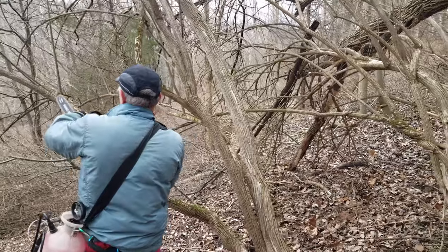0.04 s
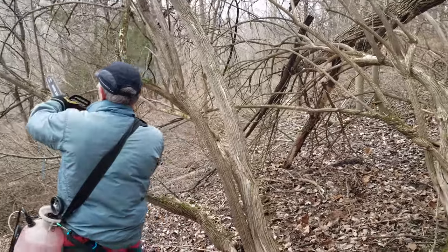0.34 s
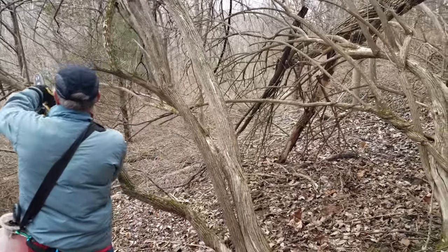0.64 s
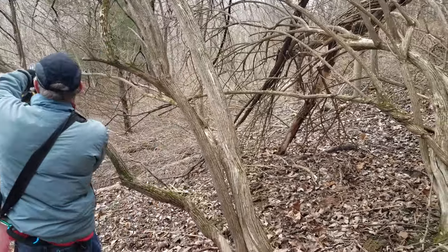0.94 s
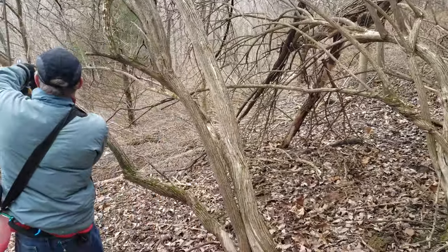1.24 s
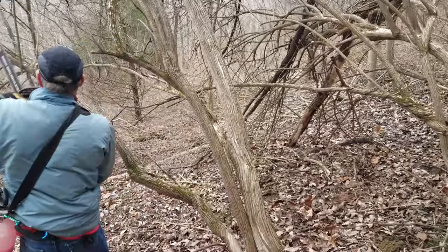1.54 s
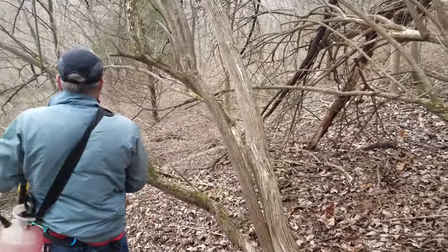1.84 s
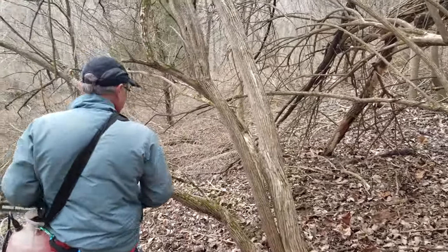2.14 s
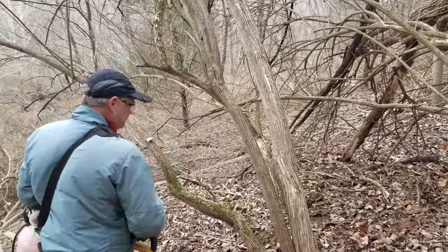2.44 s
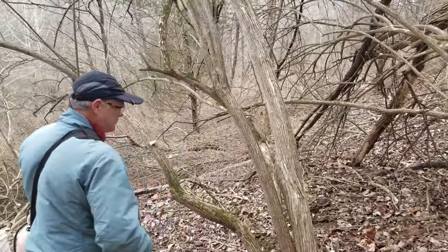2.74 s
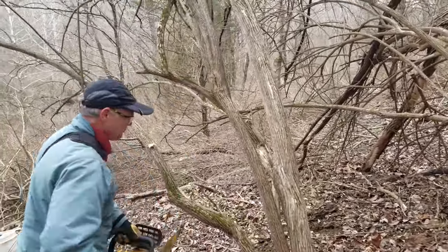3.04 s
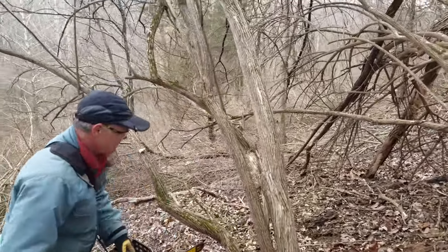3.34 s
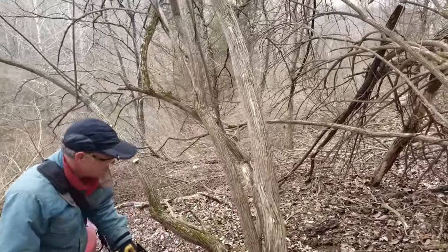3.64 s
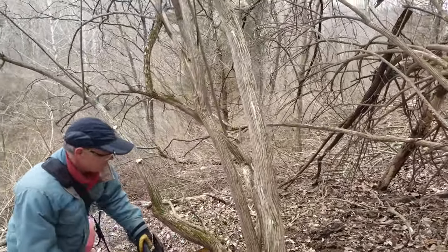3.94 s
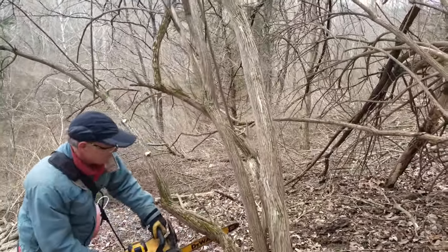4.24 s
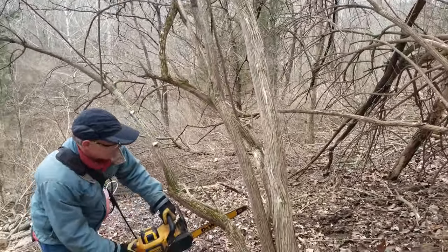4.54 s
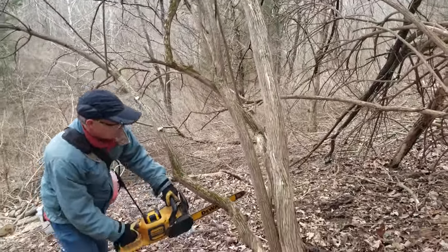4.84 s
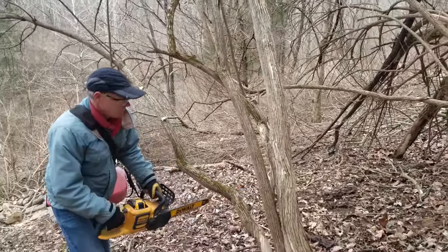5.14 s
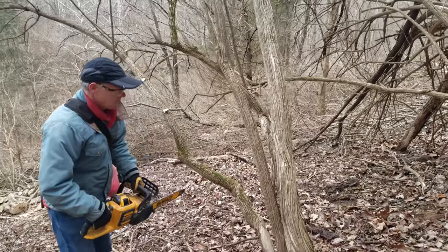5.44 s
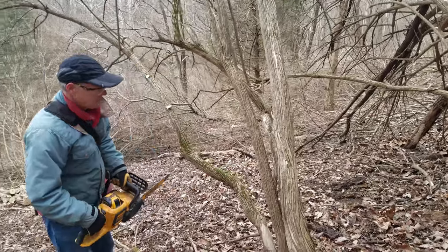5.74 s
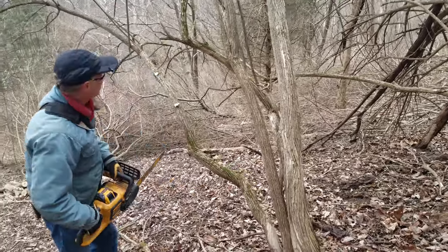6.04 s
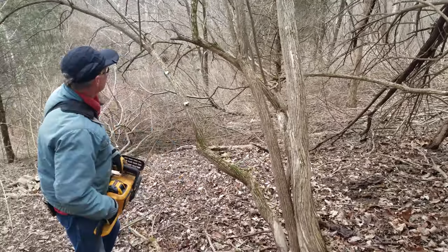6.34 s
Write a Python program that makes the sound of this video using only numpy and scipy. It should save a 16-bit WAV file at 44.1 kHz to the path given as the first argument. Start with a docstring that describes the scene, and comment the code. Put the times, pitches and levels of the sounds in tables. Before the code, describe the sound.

A battery chainsaw runs at full speed close by, a high whine with a rattling, hissing chain, biting through thin stems before it quickly winds down. In the pause a jacket and dry leaves rustle faintly, with soft steps, a knock and small twig snaps. The saw whines up again, cuts briefly and stops. More twigs crack in the quiet woodland.

```python
"""A battery chainsaw whines at full speed overhead in a wood, bites through shrub stems and brakes.
It runs again at waist height. Chain links strike sprocket and bar: a whine at the link rate, a rattle in
the housing and a steel sizzle that breaks into single ticks as the chain slows. After each run a jacket
and dry leaves rustle, twigs snap and something knocks. Trunks return a thin echo."""
import sys
import numpy as np
from scipy import signal
from scipy.fft import rfft, irfft
from scipy.io import wavfile
from scipy.ndimage import uniform_filter1d, minimum_filter1d, map_coordinates

SR = 44100
rng = np.random.default_rng(int(sys.argv[2]) if len(sys.argv) > 2 else 0)


def unload_audio(sound):
    """Save the sound as a 16-bit wav file, at the path given as the first command line argument."""
    columns = np.transpose(np.atleast_2d(sound))
    # keep every value between -1 and 1, then stretch to whole-number steps
    steps = np.round(np.clip(columns, -1, 1) * 32767)
    wavfile.write(sys.argv[1], SR, steps.astype(np.int16))


N = 281780
T = np.arange(N) / SR

# spectra: (frequency [Hz], level [dB])
AIR_SPECTRUM = [(12, -25.5), (25, -4.5), (160, -3), (300, -6), (2000, -11), (5000, -55)]
CLOTH_SPECTRUM = [(100, -25), (300, -12.5), (1200, -3.5), (2400, -3), (3300, -12), (7000, -44)]
LEAF_SPECTRUM = [(1500, -20), (3400, 4.5), (5900, 1.5), (8200, -17), (12400, -12.5), (15700, -20.5)]
TWIG_SPECTRUM = [(150, -20), (600, 5), (3000, -0.5), (6500, -8), (8500, -27), (12000, -17.5), (16000, -18)]
SHUDDER_SPECTRUM = [(25, -47), (110, -1.5), (220, -1), (550, -4), (900, -13)]
HOUSING_SPECTRUM = [(50, -44.5), (250, -15), (365, -12.5), (415, -6), (480, -8.5), (680, -5), (850, 0),
                    (1150, 1.5), (1850, 0.5), (2550, 3), (3200, -10), (4500, -13.5), (8000, -78.5)]
SIZZLE_SPECTRA = [
    [(1500, -34), (3200, -10), (5500, -4.5), (6900, -7), (8600, -19.5), (11400, -5), (12600, -5),
     (14300, -6), (15700, -12)],
    [(1500, -27.5), (3200, -6), (5100, -3), (5800, -3.5), (7000, 0), (8700, -14.5), (10100, -8.5),
     (11700, -0.5), (15700, -18)],
]  # overhead, then waist height
SOIL_SPECTRUM = [(40, -18), (110, 1), (220, 4), (500, -9), (2000, -46)]
ECHO_SPECTRUM = [(200, 2.5), (1500, -3), (3000, 3), (9000, -22)]
# footfalls: (time [s], level [dB])
STEPS = [(2.94, -50), (3.053, -49), (3.12, -45)]
# body movements: (time [s], half length [s], cloth [dB], leaves [dB])
MOVES = [(2.32, 0.094, -51, -62), (2.682, 0.048, -48.5, -55), (3.434, 0.14, -50, -56),
         (3.688, .05, -52.5, -60), (5.125, 0.026, -39.5, -44), (5.217, 0.1, -48, -54),
         (5.452, 0.1, -52.5, -54), (5.998, 0.033, -52, -67.5), (6.275, 0.17, -53.5, -61)]
# breaking twigs: (time [s], relative level [dB], ring [Hz], t60 [s], broadband crack [dB])
SNAPS = [(1.836, -33, 2800, 0.053, -13), (2.028, -15, 2270, 0.021, -18), (2.693, -30.5, 1020, .025, -10),
         (2.715, -24, 2560, 0.082, -19), (2.769, -28, 1900, 0.13, -8), (3.059, -31, 2120, .027, -21),
         (3.199, -31.5, 1490, 0.029, -1), (3.283, -30, 1500, 0.038, -5), (5.106, -12.5, 1107, 0.044, -10),
         (5.277, -9.5, 3300, 0.026, -16), (5.478, -22, 1050, 0.028, -8), (5.567, -29, 4500, .015, -10),
         (5.694, -19, 1600, 0.035, -6), (5.703, -27, 1300, .035, -8), (5.765, -27, 950, .03, -10),
         (5.769, -19.5, 1400, 0.04, -9), (5.868, -28.5, 1130, 0.03, -25), (5.999, -31, 1500, .025, -16),
         (6.289, -20, 1100, 0.036, -8)]
# impact modes: (frequency [Hz], level [dB], t60 [s])
HOLLOW_MODES = [(169, -16, 0.042), (482, -19, 0.042), (1220, -14, 0.013), (1290, -16, 0.013),
                (1820, -15, 0.021)]
DRIVE_MODES = [(533, -19, 0.033), (820, -9, 0.019), (1170, -2.5, 0.013), (2500, -9, 0.017)]  # drive takes up the chain
CLACK_MODES = [(458, -37, .04), (969, -34, .04), (1292, -24, .03), (2067, -22, .04), (3714, -25, .04)]  # wood hits the saw
# rings of cover, bar and chain: (frequency [Hz], width [Hz], overhead [dB], waist height [dB])
STEEL_RINGS = [(417, 40, -40, -39.5), (1049, 69, -31.5, -45.5), (1618, 190, -28, -35),
               (5180, 140, -46.5, -35), (7000, 170, -44.5, -36)]
# singing bar, one curve per ring: (time [s], pitch [Hz], level [dB])
BAR_CURVES = [
    [(0, 2220, -26), (.55, 2230, -20), (.95, 2260, -21.5), (1.15, 2370, -19), (1.46, 2320, -29)],
    [(.9, 2680, -32), (1.25, 2780, -19), (1.33, 2680, -25)],
    [(4.02, 2100, -26), (4.08, 2400, -23.5), (4.14, 2440, -27), (4.21, 2270, -23), (4.28, 2130, -32)],
]
# stem bites: (time [s], half length [s], link rate drag [Hz], chatter [Hz], chatter [dB], shudder [dB])
BITES = [(1.07, .03, 7.45, 1470, -33.5, -36), (1.142, .02, 30.1, 1600, -14, -40),
         (1.248, .014, 48, 1040, -18.5, -44), (4.357, .018, 23.5, 1820, -21, -37),
         (4.59, .04, 28, 1290, -38, -38.5), (4.684, 0.024, 28, 1850, -23, -42),
         (4.735, .022, 34, 1000, -25, -37)]
# chain in the wood: (start [s], end [s], rattle and whine boost [dB])
CUTS = [(-.1, 1.306, 2), (4.33, 4.77, 1.5)]
# sizzle as the bar turns towards or away from the listener: (time [s], gain [dB])
BAR_FACING = [(0, 4.5), (.3, 0.5), (1.3, -.5), (1.55, 1.5), (3.8, -1), (3.95, -4.5), (4.36, 1), (4.9, 2),
              (5.07, -3.5)]
# bright band of the sizzle: (time [s], level at full speed [dB])
SHIMMER = [(0, -24), (.25, -33), (1.1, -27), (1.3, -34), (1.6, -22), (3.9, -36), (4.5, -27), (5.03, -23)]
# whine: (multiple of the cutter rate, full speed [dB], climbing [dB], coasting [dB]); 2 links per cutter
WHINE_PARTIALS = [(1, -14, -24, -18), (2, 1.5, -3, -7), (4, -6, -2.5, -4.5), (6, -12, -8, -3),
                  (8, -28, -10, -3)]
# trigger pulls: (on [s], off [s], coast [s], rattle [dB], sizzle [dB], whine [dB], coasting lift [dB])
RUNS = [(-.5, 1.42, .236, -18.5, -20.5, -25.5, 0), (3.7126, 4.85, .265, -18.3, -19, -27, 0)]

FULL_LINK_HZ, CLIMB_HZ_PER_S, CHAIN_LINKS = 809.3, 2200, 56
BRAKE_EXP, INERTIA_S, SLACKEN_S = 1.4, .025, .05
STALL_SHARE, SIZZLE_MIN_SHARE = .18, .06  # of full speed
# amplitude ~ speed ** exponent; a loose, coasting chain rattles longer
RATTLE_EXP, COAST_RATTLE_EXP, SIZZLE_EXP, WHINE_EXP = .55, .34, .94, .38
WHINE_HOUSING_SHARE, GROWL_DB_PER_HZ = .6, .22
AIR_DB, CLOTH_FLOOR_DB, LEAF_FLOOR_DB, ECHO_DB = -58.5, -55.5, -64, -33
LOWPASS_HZ, LIMIT_DB = 15850, -1.7


def undb(db):
    """Decibels to gain."""
    return 10 ** (np.asarray(db) / 20)


def unit(x):
    """Scale to rms 1."""
    return x / np.sqrt(np.mean(x ** 2) + 1e-18)


def colour(x, spectrum):
    """Causal filter with a (Hz, dB) response, built from its cepstrum."""
    hz, db = np.transpose(spectrum)
    bins_hz = np.fft.rfftfreq(4096, 1 / SR)
    cepstrum = irfft(np.log(undb(np.interp(np.log(bins_hz + 1), np.log(hz), db))))
    fold = np.r_[1, np.full(len(bins_hz) - 2, 2), 1, np.zeros(len(bins_hz) - 2)]
    return signal.fftconvolve(x, irfft(np.exp(rfft(cepstrum * fold))))[:len(x)]


def noise(n=N):
    """White noise."""
    return rng.standard_normal(n)


def walk(rate_hz):
    """Slow random drift, rms 1."""
    step = int(SR / rate_hz)
    return unit(uniform_filter1d(noise()[np.arange(N) // step], step))


def narrow(hz, width_hz):
    """Noisy resonance; the centre may move."""
    baseband = signal.sosfilt(signal.butter(2, width_hz / 2, fs=SR, output="sos"), noise() + 1j * noise())
    return unit(np.real(baseband * np.exp(2j * np.pi * np.cumsum(hz + np.zeros(N)) / SR)))


def swell(at_s, half_s):
    """Gaussian rise and fall."""
    return np.exp(-((T - at_s) / half_s) ** 2 / 2)


def held(start_s, end_s, fade_s=.03):
    """Soft-edged gate."""
    return np.clip(np.minimum(T - start_s, end_s - T) / fade_s + .5, 0, 1)


def steady(envelope):
    """Even out the slow level, keep the ticks."""
    return envelope / np.sqrt(uniform_filter1d(envelope ** 2, size=1300) + 1e-9)


def add(out, at_s, sound):
    """Mix in place."""
    start = int(at_s * SR)
    out[start:start + len(sound)] += sound[:N - start]


def woodland_air():
    """Still air: a low, even hush."""
    return undb(AIR_DB) * unit(colour(noise(), AIR_SPECTRUM))


def trunk_echo(x, t60_s=.53):
    """Trunks scatter a thin, dull echo."""
    t = T[:SR // 2]
    echo = colour(noise(len(t)) * undb(-60 * t / t60_s) * (t > .015), ECHO_SPECTRUM)
    return undb(ECHO_DB) * signal.fftconvolve(x, echo / np.linalg.norm(echo))[:N]


def footfalls(decay_s=.032):
    """Boots thud on soft soil."""
    envelope, t = np.zeros(N), T[:SR // 4]
    for at_s, db in STEPS:
        add(envelope, at_s, undb(db) * np.exp(-t / decay_s))
    return envelope * unit(colour(noise(), SOIL_SPECTRUM))


def rustle(flutter_db=1.3):
    """Sliding cloth swishes; dry leaves crackle in tiny, uneven grains."""
    sparse = noise() * (rng.random(N) < .025)
    grains = unit(sparse * undb(4 * rng.exponential(size=N).clip(max=3.5)))
    cloth = unit(colour(noise() + .73 * grains, CLOTH_SPECTRUM)) * undb(flutter_db * walk(45))
    leaves = unit(colour(noise() + grains, LEAF_SPECTRUM)) * undb(flutter_db * walk(33))
    cloth_power, leaf_power = undb(CLOTH_FLOOR_DB) ** 2, undb(LEAF_FLOOR_DB) ** 2
    for at_s, half_s, cloth_db, leaf_db in MOVES:
        cloth_power += (undb(cloth_db) * swell(at_s, half_s)) ** 2
        leaf_power += (undb(leaf_db) * swell(at_s, half_s)) ** 2
    return cloth * np.sqrt(cloth_power) + leaves * np.sqrt(leaf_power)


def twig_snaps(trim_db=-10.5):
    """Fibres break in a burst with one broad ring and a faint tail of leaves."""
    out, t = np.zeros(N), T[:SR // 4]
    for at_s, db, ring_hz, t60_s, crack_db in SNAPS:
        envelope = undb(-60 * t / t60_s) + undb(-36 - 220 * t)
        fibres = noise(len(t)) * undb(4.5 * noise(len(t)))
        burst = colour(fibres * envelope, TWIG_SPECTRUM)
        ring = signal.lfilter(*signal.iirpeak(ring_hz, Q=1.8, fs=SR), burst)
        snap = ring + undb(crack_db) * burst
        peak_rms = np.sqrt(uniform_filter1d(snap ** 2, size=176).max())
        add(out, at_s, undb(db + trim_db) * snap / peak_rms)
    return out


def knock(modes, at_s, contact_s, crack_db):
    """A short, rough contact rings damped modes; a small body radiates no deep bass."""
    out, t = np.zeros(N), T[:SR // 8]
    ring = sum(undb(db - 60 * t / t60_s) * np.cos(2 * np.pi * hz * t) for hz, db, t60_s in modes)
    crack = colour(noise(len(t)) * np.exp(-t / .0027), TWIG_SPECTRUM)
    add(out, at_s, ring * (1 - np.exp(-t / contact_s)) ** 2 + undb(crack_db) * crack)
    return signal.sosfilt(signal.butter(2, modes[0][0] / 2, "highpass", fs=SR, output="sos"), out)


def motor_speed(on_s, off_s, coast_s):
    """Share of full speed: even climb, governed hold, a brake that grips ever harder."""
    climb = np.clip((T - on_s) * CLIMB_HZ_PER_S / FULL_LINK_HZ, 0, 1)
    coast = 1 - np.clip((T - off_s) / coast_s, 0, 1) ** BRAKE_EXP
    stall = np.clip(2 * coast / STALL_SHARE - 1, 0, 1) ** 2
    return climb * coast * stall


def sag_hz():
    """Link rate lost to the bites, lagged by motor inertia."""
    drag = sum(drag_hz * swell(at_s, half_s) for at_s, half_s, drag_hz, *_ in BITES)
    pole = np.exp(-1 / (INERTIA_S * SR))
    return signal.lfilter([1 - pole], [1, -pole], drag)


def steel_rings():
    """The running chain keeps steel parts ringing; levels differ by stance."""
    speeds = [motor_speed(*run[:3]) for run in RUNS]
    out = 0
    for hz, width_hz, *stance_db in STEEL_RINGS:
        out += narrow(hz, width_hz) * sum(undb(db) * speed ** 2 for db, speed in zip(stance_db, speeds))
    return out


def bar_song():
    """The bar sings as it is pressed and twisted."""
    out = 0
    for curve in BAR_CURVES:
        times_s, hz, db = np.transpose(curve)
        envelope = undb(np.interp(T, times_s, db)) * held(times_s[0], times_s[-1])
        out += envelope * narrow(np.interp(T, times_s, hz), width_hz=210)
    return out


def stem_bites():
    """At each bite the stem chatters on every fourth link and the saw shudders."""
    shudder = unit(colour(noise(), SHUDDER_SPECTRUM))
    links = np.cumsum(FULL_LINK_HZ - sag_hz()) / SR
    tugs = unit(1 + np.cos(2 * np.pi * links / 4))
    out = 0
    for at_s, half_s, _, chatter_hz, chatter_db, shudder_db in BITES:
        chatter = tugs * narrow(chatter_hz, width_hz=130)
        out += swell(at_s, half_s) * (undb(chatter_db) * chatter + undb(shudder_db) * shudder)
    return out


def link_strikes(links, link_hz, decay_s=.0008, plain_db=-1.5, wear_db=.5, scatter_db=2):
    """Impact envelope: cutters hit harder than plain links; worn links return each lap."""
    link = links.astype(int)
    wear, scatter = noise(CHAIN_LINKS), noise()
    strike_db = plain_db * (link % 2) + wear_db * wear[link % CHAIN_LINKS] + scatter_db * scatter[link]
    age_s = (links % 1) / link_hz
    return undb(strike_db) * np.exp(-age_s / decay_s)


def trunk_bounce(x):
    """The nearest trunk mirrors the treble; the path shifts as the saw moves."""
    lag_s = .0022 + .000311 * np.sin(2 * np.pi * (.4 * T + rng.random()))
    return x + .25 * map_coordinates(x, [np.arange(N) - lag_s * SR], order=3)


def chain_sizzle(strikes, speed, spectrum, level_db):
    """Bare steel follows each strike; the slowest links hit too softly to sizzle."""
    ticks = steady(strikes + .14)
    hiss = unit(trunk_bounce(colour(noise() * ticks, spectrum)))
    hiss *= undb(level_db + np.interp(T, *np.transpose(BAR_FACING)))
    shimmer = ticks * narrow(11700, width_hz=1500) * undb(np.interp(T, *np.transpose(SHIMMER)))
    force = np.maximum(speed - SIZZLE_MIN_SHARE, 0) / (1 - SIZZLE_MIN_SHARE)
    return (hiss + shimmer) * force ** SIZZLE_EXP


def housing_rattle(strikes, links, speed, off_s):
    """The housing rings on and blurs the strikes; the worn chain's clatter repeats each lap."""
    lap_samples = int(CHAIN_LINKS * SR / FULL_LINK_HZ)
    lap_index = (links / CHAIN_LINKS % 1 * lap_samples).astype(int)
    clatter = noise() + .56 * speed ** 2 * noise()[lap_index]
    rattle = unit(colour(clatter * steady(strikes + .86), HOUSING_SPECTRUM)) * undb(1.4 * walk(60))
    dull = signal.sosfiltfilt(signal.butter(2, 1300, fs=SR, output="sos"), rattle)
    treble = (rattle - dull) * speed ** .3  # slow links sound duller
    return (dull + treble) * speed ** np.where(T < off_s, RATTLE_EXP, COAST_RATTLE_EXP)


def chain_whine(links, link_hz, speed, off_s, lift_db):
    """A taut chain favours the link rate; a slack one slaps out its overtones."""
    housing_hz, housing_db = np.transpose(HOUSING_SPECTRUM)
    coasting = np.clip((T - off_s) / SLACKEN_S + .5, 0, 1)
    climbing = np.clip((1 - speed) / .15, 0, 1) * (1 - coasting)
    tone = 0
    for k, full_db, climb_db, coast_db in WHINE_PARTIALS:
        db = full_db * (1 - climbing - coasting) + climb_db * climbing + (coast_db + lift_db) * coasting
        db += WHINE_HOUSING_SHARE * np.interp(np.log(k * link_hz / 2), np.log(housing_hz), housing_db)
        if k == 1:  # cutter-rate growl swells as the motor sags
            db += GROWL_DB_PER_HZ * sag_hz()
        flutter_db = 2.2 * walk(25) + 2 * walk(140)
        wobble_rad = (.08 + .1 * climbing + .07 * coasting) * walk(70)
        tone += undb(db + flutter_db) * np.sin(k * (np.pi * links + wobble_rad))
    return np.sqrt(2) * tone * speed ** WHINE_EXP


def chainsaw(run, sizzle_spectrum):
    """One trigger pull; the link rate drives sizzle, rattle and whine."""
    on_s, off_s, coast_s, rattle_db, sizzle_db, whine_db, lift_db = run
    speed = motor_speed(on_s, off_s, coast_s)
    link_hz = np.maximum(speed * (FULL_LINK_HZ - sag_hz()), 20)
    links = np.cumsum(link_hz) / SR
    strikes = link_strikes(links, link_hz)
    sizzle = chain_sizzle(strikes, speed, sizzle_spectrum, sizzle_db)
    rattle = undb(rattle_db) * housing_rattle(strikes, links, speed, off_s)
    whine = undb(whine_db) * chain_whine(links, link_hz, speed, off_s, lift_db)
    cut_db = sum(db * held(start_s, end_s) for start_s, end_s, db in CUTS)
    return sizzle + (rattle + whine) * undb(cut_db)


def scene():
    """Saw, handling and footing over woodland air, alike in both ears."""
    saw = sum(chainsaw(run, spectrum) for run, spectrum in zip(RUNS, SIZZLE_SPECTRA))
    knocks = (knock(HOLLOW_MODES, at_s=2.055, contact_s=.00016, crack_db=-27.5)
              + knock(DRIVE_MODES, at_s=3.7125, contact_s=.00075, crack_db=-18)
              + knock(CLACK_MODES, at_s=5.2775, contact_s=.0002, crack_db=-36))
    near = saw + steel_rings() + bar_song() + stem_bites() + twig_snaps() + knocks
    return np.tile(near + woodland_air() + trunk_echo(near) + rustle() + footfalls(), (2, 1))


def record(dry):
    """Peak limiter between two steep low-passes."""
    lowpass = signal.ellip(12, .2, 80, LOWPASS_HZ, fs=SR, output="sos")
    x = signal.sosfilt(lowpass, dry)
    gain = np.minimum(1, undb(LIMIT_DB) / (np.abs(x) + 1e-9))
    smooth_gain = uniform_filter1d(minimum_filter1d(gain, size=133), size=133)
    return signal.sosfilt(lowpass, x * smooth_gain)


dry = scene()
out = record(dry)
unload_audio(out)
```